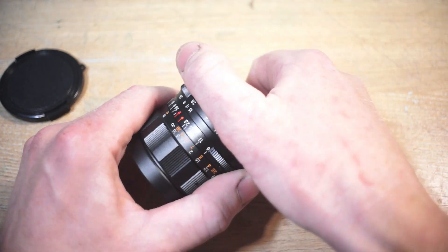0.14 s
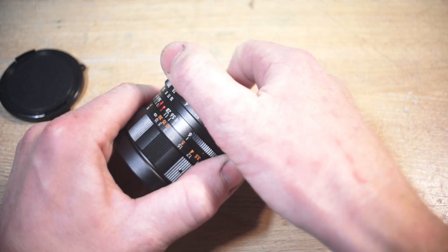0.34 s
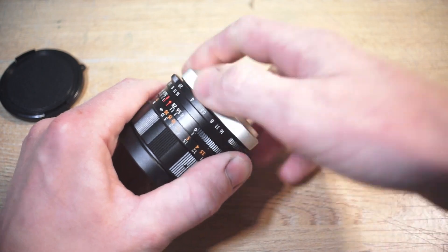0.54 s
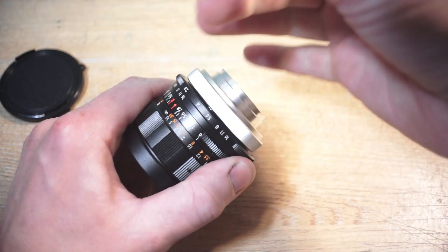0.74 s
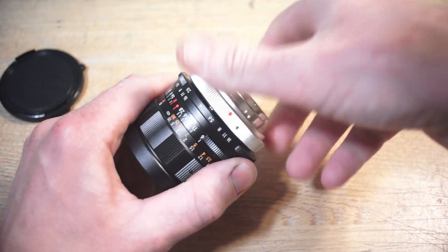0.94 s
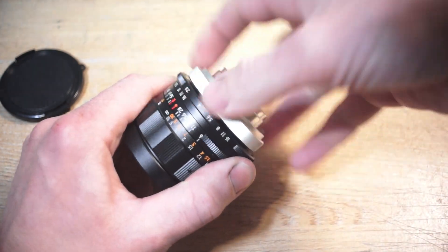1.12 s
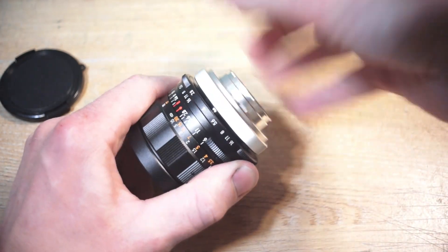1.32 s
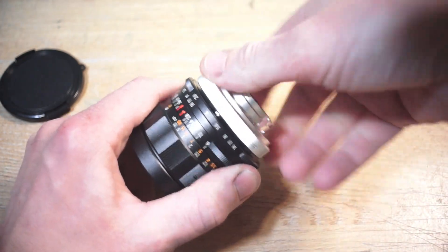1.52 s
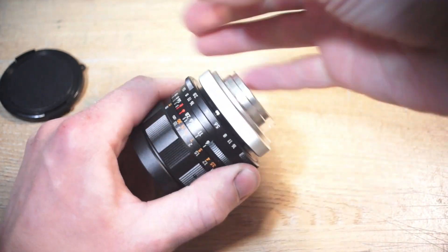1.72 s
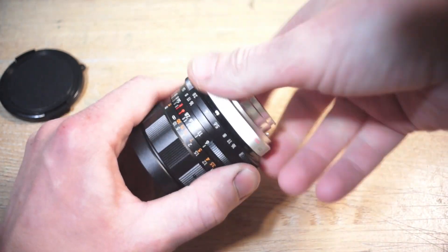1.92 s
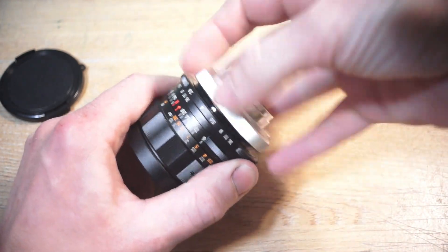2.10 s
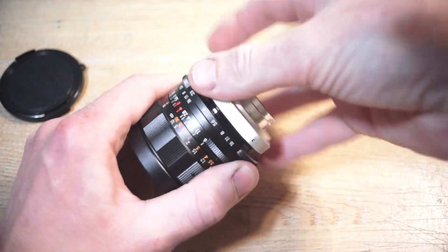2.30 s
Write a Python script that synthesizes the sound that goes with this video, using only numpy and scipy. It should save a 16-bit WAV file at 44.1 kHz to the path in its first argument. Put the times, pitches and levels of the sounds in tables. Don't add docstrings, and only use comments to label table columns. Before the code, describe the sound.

A threaded metal lens mount is twisted by hand, first soft skin rubbing, then four dry gritty scrapes with sharp clicks growing stronger, heard very close in a quiet room with faint fan hum.

```python
import sys
import numpy as np
from scipy import signal
from scipy.fft import rfft, irfft, next_fast_len
from scipy.io import wavfile

SR = 44100
rng = np.random.default_rng(int(sys.argv[2]) if len(sys.argv) > 2 else 0)


def rack_gain(trim_db):
    fader = np.asarray(trim_db, float)
    return 10 ** (fader / 20)


def pcm_store(signal):
    levels = np.round(np.clip(np.atleast_2d(signal), -1, 1) * 32767)
    wavfile.write(sys.argv[1], SR, levels.astype(np.int16).T)


N = 108089
SIDE = np.array([[1], [-1]])


def rms_one(x):
    return x / np.sqrt(np.mean(x ** 2) + 1e-20)


def bandpass(x, low_hz, high_hz, order=2):
    return signal.sosfilt(signal.butter(order, [low_hz, high_hz], "band", fs=SR, output="sos"), x)


def in_time(*tables):
    t = np.arange(N) / SR
    s, *columns = np.transpose([row for table in tables for row in table])
    inside = [np.minimum(t - rows[0][0], rows[-1][0] - t) for rows in tables]
    alive = np.max(inside, axis=0)
    level_db, *rest = [np.interp(t, s, c) for c in columns]
    return [level_db + 900 * np.minimum(alive, 0), *rest]


def at_hz(points, hz):
    table_hz, values = np.transpose(points)
    return np.interp(np.log(hz), np.log(table_hz), values)


def drift(rate_hz):
    r = np.exp(-40 * np.pi * rate_hz / SR)
    slow = signal.lfilter([1], [1, -2 * r, r * r], rng.standard_normal(N // 20 + 2002))[2000:]
    return np.interp(np.arange(N) / 20, np.arange(len(slow)), rms_one(slow))


def resonator(hz, t60):
    r, w = rack_gain(-60 / (t60 * SR)), 2 * np.pi * hz / SR
    return [0, np.sin(w)], [1, -2 * r * np.cos(w), r * r]


def ring(force, hz, t60):
    return signal.lfilter(*resonator(hz, t60), force + 1e-18)


def stereo(mid, side, alike):
    return np.sqrt(1 + alike) * mid + np.sqrt(1 - alike) * side * SIDE


# frequency in Hz, likeness from 0 to 1.
LIKENESS = [(60, 0.85), (240, 0.13), (950, 0.0083), (3770, 0.12), (15000, 0.13)]


def banded_noise(spectrum, patchy_db, alike_more):
    edges = 20 * 2 ** np.arange(0, 10, .5)
    tops = edges[1:] * np.r_[np.ones(18), 1.2]
    white = rng.standard_normal((2, 2, N))
    out = 0
    for k, (low, high) in enumerate(zip(edges, tops)):
        mid, side = bandpass(white[k % 2], low, high)
        hz = np.sqrt(low * high)
        alike = np.clip(at_hz(LIKENESS, hz) + alike_more, -1, 1)
        level = rack_gain(at_hz(spectrum, hz) + patchy_db * drift(30.5))
        out = out + level * stereo(mid, side, alike)
    return rms_one(out)


# frequency in Hz, width in Hz, level in dB.
HUM = [(28.64, 0.96, -55.5), (56, 0.93, -58.5), (149.7, 13.7, -56), (205.6, 35, -58.5), (232, 3.7, -65),
       (302, 4.7, -64.5), (573.5, 42, -64.5)]
RUMBLE_PAN_DB = -2


def hum():
    out = 0
    for hz, width, db in HUM:
        mid, side = rng.standard_normal((2, N + SR))
        pair = stereo(mid, side, np.clip(at_hz(LIKENESS, hz), 0, 1))
        line = rms_one(ring(pair, hz, 3.8 / width)[:, SR:])
        out = out + rack_gain(db + RUMBLE_PAN_DB * (hz < 100) * SIDE) * line
    return out


# frequency in Hz, level in dB.
AIR = [(12, -27), (20, -6), (119, -20.5), (252, -5), (492, -18), (581, -10.5), (1870, -21.5), (9140, -29.5),
       (15500, -31)]
AIR_DB = -46.5


def room_air():
    return rack_gain(AIR_DB - 5) * banded_noise(AIR, patchy_db=1.5, alike_more=0.0086)


ROOM_T60_S, WALL_CUT_HZ = 0.13, 3000


def room(x):
    size = next_fast_len(N + SR)
    w = 2 * np.pi * np.fft.rfftfreq(size)
    lag = rng.uniform(.002, .02, (2, 8, 1)) * SR
    wall = 1 / (1 + 1j * w * SR / (2 * np.pi * WALL_CUT_HZ))
    loop = rack_gain(-60 * lag / SR / ROOM_T60_S) * np.exp(-1j * w * lag) * wall
    return irfft(rfft(x, size) * np.sum(loop / (1 - loop), axis=1), size)[:, :N]


# time in seconds, level in dB.
RUB = [(0.0, -56), (0.104, -59.5), (0.156, -48.5), (0.314, -65), (0.324, -34), (0.344, -49.5), (.4, -52.5),
       (.435, -45), (.46, -52), (0.5, -49.5), (0.54, -37), (0.6, -54)]
RUB_AGAIN = [
    (1.02, -86),
    (1.06, -55.5),
    (1.08, -59),
    (1.088, -73),
    (1.12, -70),
]
# frequency in Hz, level in dB.
SKIN = [(1180, -2), (2000, 7.5), (2140, -18.5), (2220, -13), (3770, 10.5), (4070, 6), (8360, 10),
        (15500, -10)]


def skin_rub():
    return rack_gain(in_time(RUB, RUB_AGAIN)[0]) * banded_noise(SKIN, patchy_db=3.0, alike_more=0.84)


# time in seconds, level in dB, frequency in Hz, T60 in seconds.
BUMPS = [(.3225, -41, 1000, .035), (.3226, -44, 2150, .015), (.326, -32, 52, .13), (.333, -43, 4400, .008),
         (.334, -45, 2200, .012), (.52, -39.5, 201, .19), (1.751, -33, 42, .08), (1.754, -25, 267, .0069),
         (1.76, -44, 30, .45), (1.765, -46, 150, .15), (2.008, -43, 750, .04)]


def bumps():
    out = np.zeros(N)
    for s, db, hz, t60 in BUMPS:
        push = np.zeros(N)
        push[int(s * SR)] = 1
        out += rack_gain(db) * ring(push, hz, t60)
    return out


# frequency in Hz, level in dB, T60 in seconds.
BARREL = [(950, -9.5, 0.006), (1326, -0.5, 0.011), (1583, -4, 0.012), (2025, -14.5, 0.0055),
          (2700, -2.5, 0.00077), (3400, 7, 0.0021), (3900, -9.5, 0.0018), (4870, -1, 0.0025),
          (5200, 0, 0.0048), (5820, -3.5, 0.0054), (7190, 1, 0.0027), (7820, -1.5, 0.007),
          (8830, 0, 0.0012), (11850, 0, 0.0059)]
DULL_BELOW_HZ, BRIGHT_ABOVE_HZ = 2400, 9500


def barrel(mode_force, dryness=1):
    out = np.zeros(N)
    for k, (hz, db, t60) in enumerate(BARREL):
        out += ring(mode_force(k, hz, db), hz, t60 * dryness) * (-1) ** k
    return out


# time in seconds, frequency in Hz, level in dB.
HOLLOW = [(.6, 5400, -14), (.67, 5350, 0), (.7, 5250, -20), (.735, 5970, 11), (.752, 5500, -30),
          (0.769, 4660, 7), (.86, 4970, 4.5), (.93, 5200, -1), (1.15, 5270, -10.5), (1.2, 5280, -6),
          (1.31, 4830, 1.5), (1.47, 5010, 7.5), (1.62, 5040, -7), (1.76, 4970, 3), (1.9, 4960, -6),
          (2.05, 4970, -28), (2.21, 4924, 8.5), (2.45, 5000, -24)]
HOLLOW_DB, HOLLOW_T60_S = -0.5, .015


def hand_hollow(force):
    s, hollow_hz, db = np.transpose(HOLLOW)
    force = force * rack_gain(HOLLOW_DB + np.interp(np.arange(N) / SR, s, db))
    out, state = np.zeros(N), np.zeros(2)
    for i in range(0, N, 256):
        b, a = resonator(np.interp(i / SR, s, hollow_hz), HOLLOW_T60_S)
        out[i:i + 256], state = signal.lfilter(b, a, force[i:i + 256] + 1e-18, zi=state)
    return out


# frequency in Hz, level in dB, T60 in seconds.
RING = [(10296, 0, .14), (10319, -3, .13), (11480, -22, .05)]
# release in seconds, catch in seconds.
FREE = [
    (.75, .935),
    (1.28, 1.515),
    (1.75, 1.97),
    (2.285, 2.42),
]
HELD_DAMPING = 3.5


def free_ring(force):
    out = np.zeros(N)
    cuts = np.r_[0, (np.ravel(FREE) * SR).astype(int), N]
    for hz, db, t60 in RING:
        state = np.zeros(2)
        for k, (start, end) in enumerate(zip(cuts, cuts[1:])):
            damping = 1 if k % 2 else HELD_DAMPING
            b, a = resonator(hz, t60 / damping)
            part, state = signal.lfilter(b, a, force[start:end] + 1e-18, zi=state)
            out[start:end] += rack_gain(db) * part
    return out


# time in seconds, scrape level in dB, free ring over the scrape in dB.
TURN_A = [(.56, -66, 23), (.6, -37.5, -11), (.625, -43, 7.5), (.66, -36.5, -8), (.69, -35.5, -5),
          (.74, -32.5, -5), (.8, -35.5, -12.5), (.87, -42.5, 8.5), (.925, -59, 8)]
TURN_B = [(1.126, -56.5, -8.5), (1.154, -39.5, -9), (1.202, -31, 1), (1.23, -35, -7), (1.29, -33, -2.5),
          (1.345, -32.5, -2.5), (1.39, -40, -3), (1.43, -40.5, -13), (1.474, -58, 7.5)]
TURN_C = [(1.584, -45.5, 0), (1.615, -36, -15), (1.64, -33, -14), (1.68, -33.5, -2), (1.721, -29.5, -9),
          (1.745, -34.5, 1.5), (1.788, -33, 0.5), (1.851, -30, -14.5), (1.914, -49.5, -4)]
TURN_D = [(1.986, -43.5, -3), (2.03, -40.5, -10), (2.05, -31, -12), (2.115, -37, -10), (2.155, -45.5, 8.5),
          (2.185, -32.5, -4), (2.223, -36.5, 5.5), (2.264, -41, -18)]
TURN_E = [(2.275, -59, -3), (2.295, -35, -26), (2.318, -53.5, -28), (2.35, -49, -4), (2.37, -60, -7),
          (2.4, -51, -20)]
# time in seconds, dull part in dB, favoured Hz, bright part in dB.
BEARING = [(.58, 0.5, 5030, 1.5), (.65, -12, 3000, 0), (.7, -5, 4260, -1), (.74, -7.5, 5300, 3),
           (.8, 0, 4380, 4), (.9, 10, 4080, 13.5), (1.14, -2.5, 6000, 0.5), (1.2, -3, 5760, 3),
           (1.27, -2, 4700, 2), (1.36, 0.5, 5000, 2.5), (1.46, 7, 4520, 6), (1.62, -8, 4000, -7.5),
           (1.72, -1, 4800, 4), (1.84, -2, 3330, -2), (2.0, 2, 3500, 0), (2.06, -8, 5240, -2.5),
           (2.18, 1.5, 3300, 5), (2.26, 0.5, 3460, -4)]
GRAINS_PER_S, GRAIN_SPREAD_DB, GRIT_DB = 9000, 2.37, -13.5
WANDER_DB, STUTTER_DB, BEARING_FAVOUR_DB = 3.6, 2.2, 5


def scrape():
    level_db, ring_db = in_time(TURN_A, TURN_B, TURN_C, TURN_D, TURN_E)
    s, *bearing = np.transpose(BEARING)
    dull_db, favoured_hz, bright_db = [np.interp(np.arange(N) / SR, s, c) for c in bearing]
    sizes = rack_gain(GRAIN_SPREAD_DB * np.minimum(rng.exponential(1, N), 5)) * rng.choice([-1, 1], N)
    hits = rng.random(N) < GRAINS_PER_S / SR
    grains = rms_one(sizes * hits * rack_gain(STUTTER_DB * drift(124)))

    def mode_force(k, hz, db):
        wander_db = WANDER_DB
        if hz < DULL_BELOW_HZ:
            colour_db = dull_db
            wander_db *= .4
        elif hz > BRIGHT_ABOVE_HZ:
            colour_db = bright_db
        else:
            colour_db = 1.5 - BEARING_FAVOUR_DB * np.abs(np.log2(hz / favoured_hz))
        return grains * rack_gain(db + colour_db + wander_db * drift(15.6))

    body = rms_one(hand_hollow(grains) + barrel(mode_force))
    grit = rack_gain(GRIT_DB) * rms_one(bandpass(grains, 2500, 13000))
    singing = free_ring(grains * rack_gain(level_db + ring_db - 25.5))
    return rack_gain(level_db) * (body + grit) + singing


# time in seconds, peak in dB, dull part in dB, favoured Hz, free ring in dB.
KNOCKS = [(0.655, -21.5, 8, 4000, -39), (0.7685, -11.5, -3.5, 4480, -39), (1.076, -35.5, 4, 4050, -22),
          (1.3114, -8.5, -13, 4800, -25), (1.338, -13, -4, 5000, -27), (1.344, -13.5, -18, 6300, -42),
          (1.4166, -16.5, -23, 8100, -22.5), (1.5967, -1, -24, 7140, -17.5), (1.5982, -3, -13.5, 3760, -12),
          (1.6053, -29, 5, 3400, -28), (1.7529, 6.5, -17, 2950, -19), (1.7581, 2, -19.5, 3400, -14),
          (1.7837, -8.5, -19, 6000, -14), (1.7981, -11.5, -32, 5380, -44), (1.8464, -13, -25, 4230, -37),
          (1.9462, -9.5, -12.5, 6540, -31), (2.007, -16, -4, 3300, -31), (2.0962, -13, -8, 6350, -37),
          (2.1007, 0.5, -18.5, 5760, -55), (2.197, -11, -6.5, 3130, -16), (2.2131, 0.5, -17, 6400, -20),
          (2.2729, -10.5, -45, 3730, -52), (2.294, -23, -21, 3300, -26), (2.3573, -13.5, -8.5, 5130, -43),
          (0.4907, -32, -14, 7700, -19), (0.506, -31, -17, 4510, -34), (0.519, -29.5, -2, 4070, -30),
          (0.5343, -28, -11, 7900, -9), (1.0498, -42.5, 4, 5940, -9.5), (1.1385, -29, -4, 5900, -30),
          (1.5926, -34, -8, 5070, -30), (1.827, -22, -14, 5000, -39), (1.837, -13, -10, 3280, -30),
          (1.9536, -14, -11, 4530, -37), (2.016, -12.5, -9, 3220, -35), (2.0446, -30, -2, 5200, -33),
          (2.206, -20, -7, 5470, -33), (2.288, -38, -16, 5000, -10), (2.319, -42, 15, 5000, -20.5),
          (2.3566, -30, -4, 3520, -39)]
CHATTER_S, RATTLE_S, RATTLE_DB = .0009, 0.0055, -15
FIRST_BLOW, SOFT_BELOW_DB, CONTACT_HZ = 4.76, -24, 8200
STRIKE_SPREAD_DB, FAVOUR_DB = 3.5, 6
CRACK_DB, HOLLOW_KNOCK_DB, OWN_NOTE_DB, OWN_NOTE_CYCLES = -14, -12, -3, 13
BRIGHT_FOLLOWS_RING, KNOCK_DRYNESS = .3, 0.96


def knocks():
    s, db, dull_db, favoured_hz, ring_db = np.transpose(KNOCKS)
    t = np.arange(1600) / SR
    at = (s * SR).astype(int)[:, None] + np.arange(1600)
    decay = np.exp(-t / CHATTER_S) + rack_gain(RATTLE_DB) * np.exp(-t / RATTLE_S)
    shape = decay * np.minimum(t / 0.0019, 1)
    chatter = rng.standard_normal(at.shape) * rng.exponential(1, at.shape) ** .5 * shape
    chatter[:, 20] = FIRST_BLOW * np.clip(1 - db / SOFT_BELOW_DB, .15, 1)
    chatter /= np.sqrt(np.sum(chatter ** 2, axis=1, keepdims=True))
    share = rng.standard_normal((len(s), len(BARREL)))

    def force(extra_db):
        f = np.zeros(N + SR)
        np.add.at(f, at, chatter * rack_gain(db + extra_db)[:, None])
        return signal.lfilter(*signal.butter(1, CONTACT_HZ, fs=SR), f[:N])

    def favour(hz):
        return -FAVOUR_DB * np.abs(np.log2(hz / favoured_hz))

    def mode_force(k, hz, mode_db):
        colour_db = dull_db if hz < DULL_BELOW_HZ else favour(hz)
        if hz > BRIGHT_ABOVE_HZ:
            colour_db = colour_db + BRIGHT_FOLLOWS_RING * (ring_db + 32)
        return force(mode_db - 5.0 + STRIKE_SPREAD_DB * share[:, k] + colour_db)

    out = bandpass(force(CRACK_DB), 2500, 12000)
    out += barrel(mode_force, KNOCK_DRYNESS)
    out += hand_hollow(force(HOLLOW_KNOCK_DB + favour(4900)))
    for k, hz in enumerate(favoured_hz):
        out[at[k]] += ring(chatter[k], hz, OWN_NOTE_CYCLES / hz) * rack_gain(db[k] + OWN_NOTE_DB)
    tap = np.zeros(N)
    tap[at[:, 0] + 20] = rack_gain(db + ring_db)
    return out + free_ring(tap)


SCATTER_DB, ROOM_DB = -9.5, -14
LENS_PAN_DB, BUMP_PAN_DB = -0.4, -3.5


def scene():
    lens = bandpass(scrape() + knocks(), 766, 13500, order=4)
    glints = np.diff(rng.standard_normal(61)) * np.exp(-np.arange(60) / 20) / 4
    scatter = np.convolve(lens, glints)[:N] * np.tanh(2 * drift(40)) * SIDE
    direct = (lens + rack_gain(SCATTER_DB) * scatter) * rack_gain(LENS_PAN_DB * SIDE)
    palm = bumps() * rack_gain(BUMP_PAN_DB * SIDE)
    return hum() + room_air() + rack_gain(ROOM_DB) * room(lens) + skin_rub() + palm + direct


def top_cut(x):
    return signal.sosfilt(signal.butter(12, 15670, fs=SR, output="sos"), x)


def record(dry):
    x = signal.sosfilt(signal.butter(2, 18, "high", fs=SR, output="sos"), dry)
    return top_cut(np.clip(x, -1, 1))


dry = scene()
out = record(dry)
pcm_store(out)
```